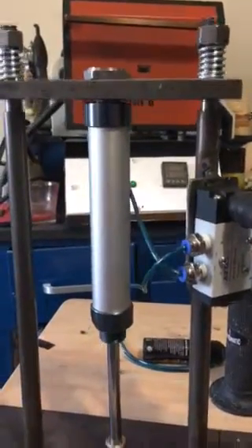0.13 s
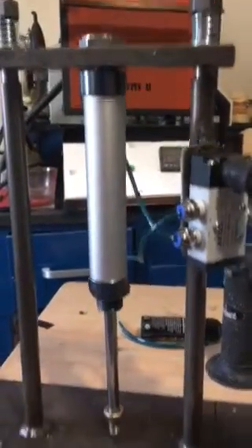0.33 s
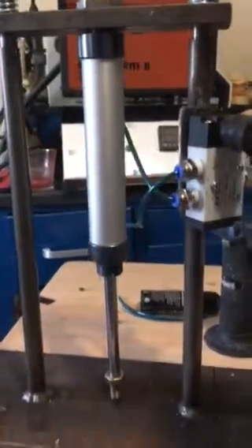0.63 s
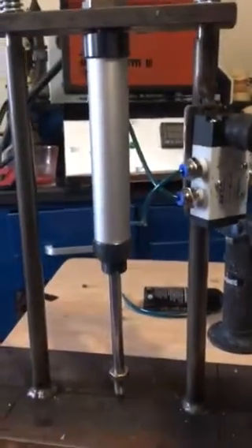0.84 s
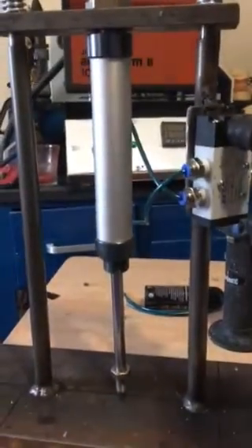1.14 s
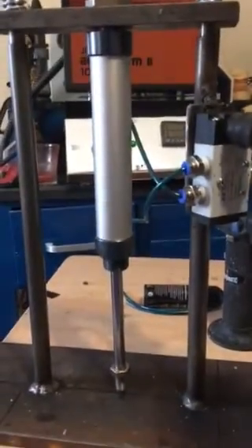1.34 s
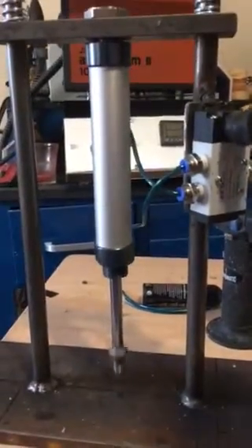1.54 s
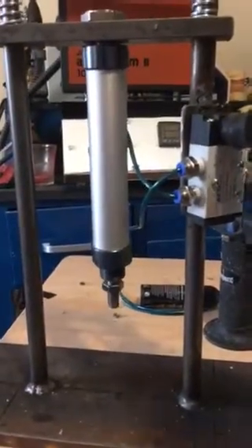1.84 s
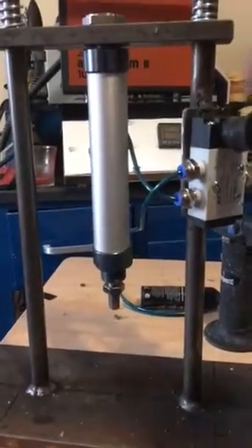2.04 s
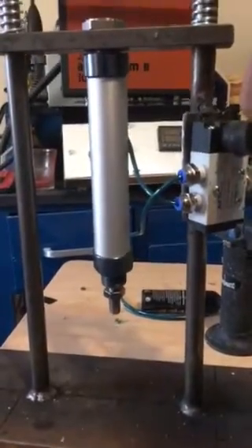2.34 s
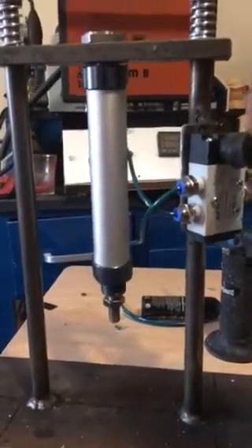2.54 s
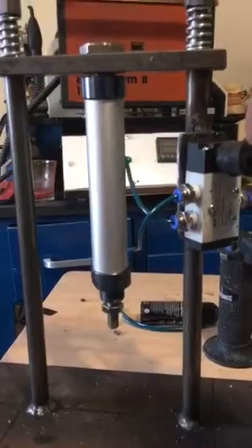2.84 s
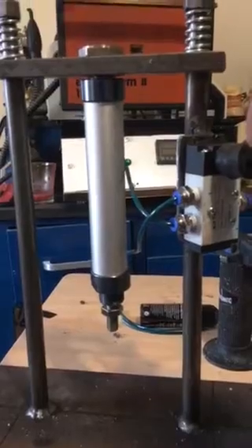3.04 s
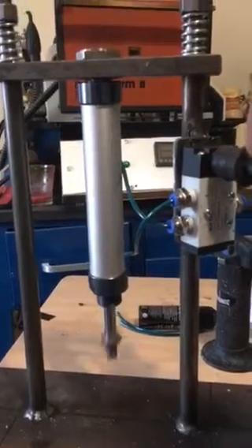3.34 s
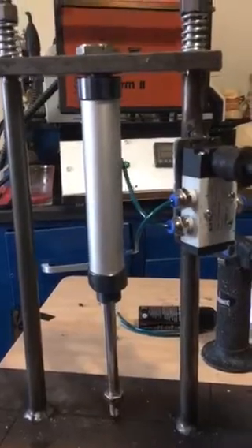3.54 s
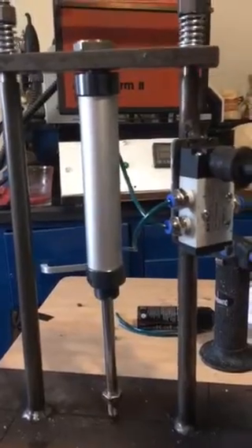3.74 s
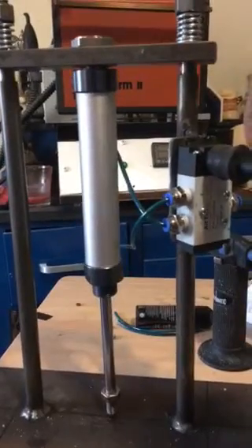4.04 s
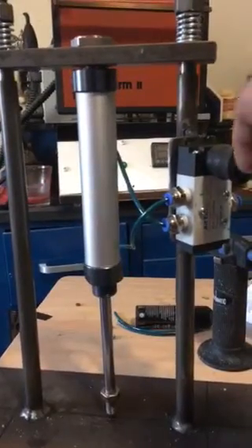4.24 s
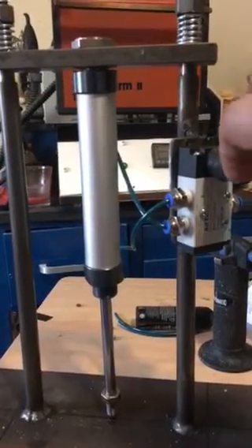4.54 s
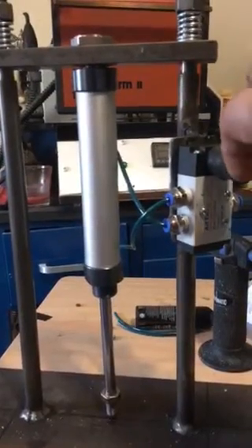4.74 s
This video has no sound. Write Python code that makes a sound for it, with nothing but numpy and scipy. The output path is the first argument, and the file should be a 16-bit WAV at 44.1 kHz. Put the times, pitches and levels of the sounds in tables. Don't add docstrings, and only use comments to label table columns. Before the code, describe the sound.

Two sharp, loud blasts of compressed air from a pneumatic cylinder valve, each ending in a hard metal knock, in a quiet small workshop.

```python
import sys
import numpy as np
from scipy import signal
from scipy.fft import rfft, irfft, next_fast_len
from scipy.io import wavfile
from scipy.ndimage import uniform_filter1d, map_coordinates

SR = 44100
rng = np.random.default_rng(int(sys.argv[2]) if len(sys.argv) > 2 else 0)


def amplitude_ratio(level_db):
    exponent = np.asarray(level_db, float) / 20
    return 10 ** exponent


def inscribe(sig):
    pcm = np.round(np.clip(np.atleast_2d(sig).T, -1, 1) * 32767)
    wavfile.write(sys.argv[1], SR, pcm.astype(np.int16))


N = 215539
TIME = np.arange(N) / SR

# (opens [s], closes [s], opening time [s], closing T60 [s])
STROKES = [
    (1.479, 1.79, 0.0045, 0.025),
    (3.295, 3.554, .006, .1),
]


def unit(x):
    return x / np.sqrt(np.mean(x ** 2) + 1e-20)


def along(points, hz):
    f, v = np.transpose(points)
    return np.interp(np.log(hz + 1), np.log(f + 1), v)


def since(s):
    return np.maximum(TIME - s, 0)


def wobble(rate):
    return map_coordinates(rng.standard_normal(int(N * rate / SR) + 4), [TIME * rate])


def noise(gain):
    m = next_fast_len(N)
    hz = np.fft.rfftfreq(m, 1 / SR)
    spectrum = rng.standard_normal(2 * len(hz)).view(complex) * gain(hz)
    return unit(irfft(spectrum, m)[:N])


def resonance(f, centre, width):
    return 1 / (1 + (2 * (f - centre) / width) ** 2)


def pulse(t, peak):
    return t / peak * np.exp(1 - t / peak)


def swell(s, db, rise, t60):
    return amplitude_ratio(db - 60 * since(s) / t60) * np.exp(np.minimum(TIME - s, 0) / rise)


def swells(rows, wide=0, width_hz=0):
    total = 0
    for *level, hz in rows:
        w = wide * hz + width_hz
        band = noise(lambda f: (f * w) ** 2 / ((hz * hz - f * f) ** 2 + (f * w) ** 2))
        total = total + swell(*level) * band
    return total


def ring(s, hz, t60, free=0):
    t = since(s)
    onset = 1 - np.exp(-t / .0006)
    return amplitude_ratio(-60 * np.maximum(t - free, 0) / t60) * np.sin(2 * np.pi * hz * t) * onset


def crack(s, t60):
    dull = noise(lambda f: 1 / (1 + (f / 7000) ** 4) / (1 + (800 / (f + 1)) ** 3))
    return (TIME > s) * amplitude_ratio(-60 * since(s) / t60) * dull


def room_tone():
    # (frequency [Hz], density [dB])
    rumble_colour = [(18, -30.5), (30, -3.5), (59, -1.5), (183, -10.5), (238, -5.5), (264, -15), (305, -13),
                     (471, -21), (510, -30), (700, -25.5), (910, -53), (1540, -120)]
    air_colour = [(290, -30), (500, -5), (750, -5), (988, -4.5), (1530, -3.5), (1690, -5), (2190, -5.5),
                  (5970, -8.5), (13400, -16), (16000, -20)]
    # (closes [s], opens [s], treble gain [dB])
    gate_spans = [
        (.32, .76, -4.5),
        (.93, 1.07, -6),
        (2.223, 2.37, -10),
    ]
    rumble = amplitude_ratio(-62.5 + 2 * wobble(21)) * noise(lambda f: amplitude_ratio(along(rumble_colour, f)))
    gate_db = sum(db * ((TIME > a) & (TIME < b)) for a, b, db in gate_spans)
    ducked = amplitude_ratio(uniform_filter1d(gate_db, size=1200))
    treble = lambda f: 1 / (1 + (2400 / (f + 1)) ** 6)
    mids = amplitude_ratio(-72.5) * noise(lambda f: amplitude_ratio(along(air_colour, f)) * np.sqrt(1 - treble(f)))
    highs = amplitude_ratio(-70.5) * noise(lambda f: amplitude_ratio(along(air_colour, f)) * np.sqrt(treble(f)))
    return rumble + amplitude_ratio(.6 * wobble(22)) * (mids + ducked * highs)


def rustles():
    # (time [s], level [dB rms], rise [s], T60 [s], centre [Hz])
    rustle_rows = [(.001, -61, .002, .23, 3500), (.24, -69, .09, 0.54, 1500), (.64, -83, .01, 0.28, 4500),
                   (.855, -66, .05, 0.39, 3000), (1.09, -70, .019, 3.2, 1600), (1.41, -70, .074, .5, 3200),
                   (1.95, -75, .052, 1, 4190), (2.85, -72, 0.092, .8, 6013), (3.8, -70.5, .03, 7.1, 6500),
                   (3.97, -68, .062, 0.41, 5300), (4.59, -68, .03, .5, 1700)]
    return swells(rustle_rows, wide=1.5)


def handling():
    # (time [s], level [dB rms], rise [s], T60 [s], centre [Hz])
    hand_shifts = [(.26, -59, 0.035, 0.36, 80), (.53, -59, .01, .3, 75), (.62, -57.5, .02, 0.18, 100),
                   (.95, -60.5, 0.027, 0.38, 60), (1.35, -61.5, .02, .3, 70),
                   (2.85, -60.5, 0.039, .5, 150.7)]
    return swells(hand_shifts, wide=1.2)


def whistles():
    # (time [s], level [dB rms], rise [s], T60 [s], centre [Hz])
    whistle_rows = [(.017, -62.5, .05, 0.25, 4100), (.2, -80, .01, .66, 3100), (.64, -73, .008, 0.13, 3300),
                    (1.08, -74.5, .01, 0.41, 4500), (1.537, -21.5, .004, .06, 3300),
                    (1.65, -36, .039, 0.5, 550), (3.556, -32, .0035, 0.11, 792),
                    (3.78, -55, .02, 0.3, 4130)]
    return swells(whistle_rows, width_hz=220)


def frame():
    note_hz, build_s = 749.4, .3
    # (time [s], level [dB rms], T60 [s], damped at [s])
    blow_rows = [
        (-.5, -72, 15, .45),
        (1.8, -42, 3.32, 3.29),
        (3.57, -58.5, 1.7, 4.4),
    ]
    level = 0
    for s, db, t60, damped in blow_rows:
        decay_db = db - 60 * since(s) / t60 - 60 * since(damped) / .4
        level = level + amplitude_ratio(decay_db) * np.sqrt(1 - np.exp(-since(s) / build_s))
    return np.sqrt(2) * level * np.sin(2 * np.pi * note_hz * TIME)


def thuds():
    # (time [s], level [dB rms])
    thud_times = [
        (1.795, -28),
        (3.556, -28),
    ]
    # (centre [Hz], width [Hz], level [dB], T60 [s])
    bench_modes = [(228, 180, -10.5, 0.28), (1500, 2200, -1.5, .09)]
    total = 0
    for s, db in thud_times:
        for hz, w, level, t60 in bench_modes:
            total = total + swells([(s, db + level, .003, t60, hz)], width_hz=w)
    return total


def spool_ticks():
    # (time [s], peak [dB], frequency [Hz], T60 [s], crack [dB])
    tick_rows = [(1.455, -52, 4000, 0.0073, 9.5), (1.4653, -21, 3628, .012, -7.5),
                 (2.2767, -50, 1337, 0.027, -16), (2.277, -56, 1902, 0.024, -30),
                 (2.351, -60, 1350, .03, -30), (4.031, -50, 158.7, 0.23, -30),
                 (4.585, -48.5, 59.2, 0.22, -25), (2.925, -50.5, 90, 0.087, -36)]
    total = 0
    for s, db, hz, t60, crack_db in tick_rows:
        total = total + amplitude_ratio(db) * (ring(s, hz, t60) + amplitude_ratio(crack_db) * crack(s, 0.012))
    return total


def end_caps():
    # (time [s], cap [index], ring [dB], crack [dB], free ringing [s])
    stop_rows = [
        (1.794, 0, -22, -15, .004),
        (3.5485, 1, -6.5, -19, .0105),
        (3.5615, 1, -17, -30, .012),
    ]
    # (frequency [Hz], level [dB], T60 [s])
    cap_modes = [
        [(930, -4, .015), (1435, -33, .7), (2440, -17, .4), (5380, -6, .02)],
        [(4120, 0, .012), (4275, -13, .012), (6145, -8, .012), (6270, -13, .012), (5850, -17, .012),
         (800, -17, .02), (1530, -27, .015), (3350, -24, .01)],
    ]
    total = 0
    for s, cap, db, crack_db, free in stop_rows:
        modes = sum(amplitude_ratio(level) * ring(s, hz, t60, free) for hz, level, t60 in cap_modes[int(cap)])
        total = total + amplitude_ratio(db) * modes + amplitude_ratio(crack_db) * crack(s, 0.031)
    return total


def spits():
    # (time [s], level [dB rms], rise [s], T60 [s], centre [Hz])
    spit_rows = [
        (1.459, -61, .004, .3, 7990),
        (1.478, -12, .0016, 0.055, 7214),
        (1.479, -19.5, .0015, 0.046, 1208),
        (3.279, -57.5, .0059, .25, 6500),
        (3.3, -38, 0.0026, 0.045, 1188),
    ]
    return swells(spit_rows, wide=2.2)


def valve_opening(opens, closes, rise, fall):
    return np.clip((TIME - opens) / rise, 0, 1) ** 2 * amplitude_ratio(-60 * since(closes) / fall)


def puff(s, db, swing, longer, peak):
    t = since(s)
    half_cycles = np.log1p(t * (longer - 1) / swing) / np.log(longer)
    return amplitude_ratio(db) * pulse(t, peak) * np.sin(np.pi * half_cycles)


def buffeting():
    # (time [s], level [dB rms], rise [s], T60 [s])
    gust_rows = [(1.5, -29.5, .005, .15), (1.56, -39.5, 0.038, 1.6), (1.632, -28.5, .015, 0.29),
                 (1.695, -33.5, 0.012, 0.27), (3.31, -41, .005, 0.14), (3.4, -52.5, .03, 2.4),
                 (3.545, -49, 0.01, 0.092)]
    # (frequency [Hz], density [dB])
    buffet_colour = [(25, -20), (60, -12), (170, -4), (500, -8.5), (900, -22.5)]
    # (time [s], peak [dB], first half swing [s], swing growth [ratio], peak after [s])
    puff_rows = [
        (1.4806, -7, 0.0011, 2.6, 0.002),
        (3.2992, -30.5, 0.00535, 1.06, 0.0072),
    ]
    flowing = sum(valve_opening(*row) for row in STROKES)
    gusts = sum(swell(*row) for row in gust_rows) * amplitude_ratio(1.3 * wobble(30))
    wind = flowing * gusts * noise(lambda f: amplitude_ratio(along(buffet_colour, f)))
    return wind + sum(puff(*row) for row in puff_rows)


def jets():
    # (peak after [s], surge [dB], stream [dB], sag [dB/s], hiss re stream [dB])
    blowdown_rows = [
        (0.032, 6.5, -17.5, -0.5, -18),
        (.007, 8.5, -18.5, 16.5, -22.5),
    ]
    # (frequency [Hz], density [dB])
    jet_colours = [
        [(1530, -46.5), (2600, -22.5), (3700, -14), (4550, -1), (4910, -7.5), (5420, -1.5), (6670, -6),
         (7250, -4.5), (7950, -7.5), (9120, -6), (10600, -18.5), (13100, -11.5), (13600, -10), (14300, -1.5),
         (16200, -14.5)],
        [(1180, -41.5), (2000, -15.5), (2490, -11), (2940, -13.5), (3600, -2), (4320, -7), (4720, -2),
         (5150, -5), (5970, -0.5), (8480, -4.5), (10400, -9), (11600, -4.5), (13100, -6.5), (14200, -4),
         (16200, -7)],
    ]
    # (centre [Hz], width [Hz], level [dB])
    port_modes = [
        [(4580, 110, 0), (5150, 73, -1), (5430, 230, -3), (6220, 48, -4), (7310, 430, -4), (7960, 42, -8),
         (8890, 150, -7), (9490, 59, -13), (14000, 170, -3), (14600, 170, -9)],
        [(3670, 78, 0), (4840, 170, -1), (5910, 120, 0), (7380, 83, -2), (8320, 67, -1), (11800, 170, -2),
         (13100, 89, -8), (13800, 140, -4), (14300, 69, -2), (15700, 65, -8)],
    ]
    # (centre [Hz], width [Hz], gain [dB])
    hollow_bands = [
        [(4900, 200, -5), (7800, 120, -12), (8450, 200, -10), (9200, 250, -7), (9900, 150, -10),
         (14430, 200, -14)],
        [(8000, 200, -8), (9550, 200, -5), (12900, 200, -4), (13400, 250, -8), (15480, 250, -12)],
    ]
    # (frequency [Hz], density [dB])
    hiss_colour = [(400, -30.5), (700, -3.5), (1300, 5.5), (2500, 2.5), (4000, -25)]
    aside_colour = [(1500, -1.5), (3000, 4.5), (6000, 1), (10000, -3.5), (16000, -4.5)]
    surge_sharp = 1.4
    hiss_follows = 0.38
    air, sideways = np.zeros((2, N))
    strokes = zip(STROKES, blowdown_rows, jet_colours, port_modes, hollow_bands)
    for stroke, (peak, surge_db, stream_db, sag, under_db), colour, ports, hollows in strokes:
        opens, closes = stroke[:2]
        valve = valve_opening(*stroke)
        t = np.clip(TIME - opens, 0, closes - opens)
        surge = surge_db * pulse(t, peak) ** surge_sharp
        stream = stream_db - sag * t
        jet_level = amplitude_ratio(stream + surge)
        hiss_level = amplitude_ratio(stream + under_db + hiss_follows * surge + 1.5 * wobble(30))

        def port_gain(f):
            peaks = np.sqrt(1 + 3 * sum(amplitude_ratio(db) * resonance(f, c, w) for c, w, db in ports))
            hollow_db = sum(db * resonance(f, c, w) for c, w, db in hollows)
            return amplitude_ratio(along(colour, f) + hollow_db) * peaks

        eddies = amplitude_ratio(1.0 * wobble(250) + 0.6 * wobble(40))
        jet = unit(eddies * noise(port_gain))
        hiss = hiss_level * noise(lambda f: amplitude_ratio(along(hiss_colour, f)))
        air += valve * (jet_level * jet + hiss)
        side = noise(lambda f: amplitude_ratio(0.75 * along(colour, f) + along(aside_colour, f)))
        sideways += valve * (jet_level * side + amplitude_ratio(-2.0) * hiss)
    return air, sideways


def nearby(x):
    scatter_db, scatter_t60 = -8, 0.06
    t = np.arange(SR // 20) / SR
    scatter = rng.standard_normal(len(t)) * amplitude_ratio(-60 * t / scatter_t60) * (t > .0008)
    reflected = signal.fftconvolve(x, scatter / np.linalg.norm(scatter))[:N]
    return (x + amplitude_ratio(scatter_db) * reflected) / np.sqrt(1 + amplitude_ratio(2 * scatter_db))


def walls(x, share):
    # (frequency [Hz], T60 [s])
    wall_t60 = [(150, 0.23), (1000, 0.44), (4000, 0.38), (9000, 0.31), (15000, 0.24)]
    hz, t, z = signal.stft(rng.standard_normal(SR), SR, nperseg=256)
    decay = amplitude_ratio(-60 * t / (share * along(wall_t60, hz)[:, None]))
    tail = signal.istft(z * decay, SR, nperseg=256)[1]
    delayed = np.pad(x, (200, 0))
    return signal.fftconvolve(delayed, tail / np.linalg.norm(tail))[:N]


def scene():
    air, sideways = jets()
    blows = end_caps() + spool_ticks() + thuds()
    background = room_tone() + rustles() + handling()
    direct = nearby(air) + blows + buffeting() + frame() + spits() + whistles()
    echoes = amplitude_ratio(-8.5) * walls(sideways, share=0.98) + amplitude_ratio(-11.0) * walls(blows, share=0.94)
    mono = background + direct + echoes
    return np.array([mono, mono])


def gain_control():
    duck_starts = [1.8, 3.59]
    duck_db, sink_s, hold_s, recover_s = -3, 0.093, 0.055, 0.031
    corners = np.cumsum([0, sink_s, hold_s, recover_s])
    return amplitude_ratio(sum(np.interp(TIME - s, corners, [0, duck_db, duck_db, 0]) for s in duck_starts))


def roll_off(x):
    return signal.sosfilt(signal.butter(12, 16980, fs=SR, output="sos"), x)


def record(dry):
    dry = dry * gain_control()
    held = dry / (1 + np.abs(dry / .8) ** 5) ** (1 / 5)
    m = next_fast_len(N)
    hz = np.fft.rfftfreq(m, 1 / SR)
    treble_db = np.maximum(-np.maximum(hz - 15730, 0) / 2.5, -45)
    notch_db = 5 / (1 + ((hz - 10500) / 350) ** 2)
    bass_cut = 1 / (1 + (32 / (hz + 1)) ** 3)
    mix = irfft(rfft(held, m) * amplitude_ratio(treble_db - notch_db) * bass_cut, m)[:, :N]
    return roll_off(mix)


dry = scene()
out = record(dry)
inscribe(out)
```